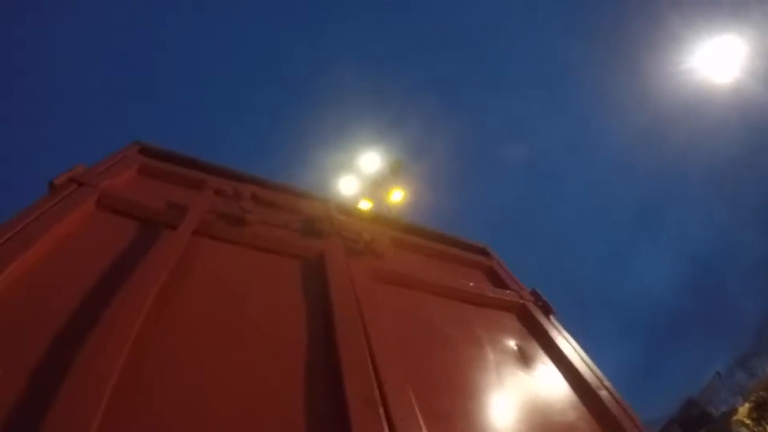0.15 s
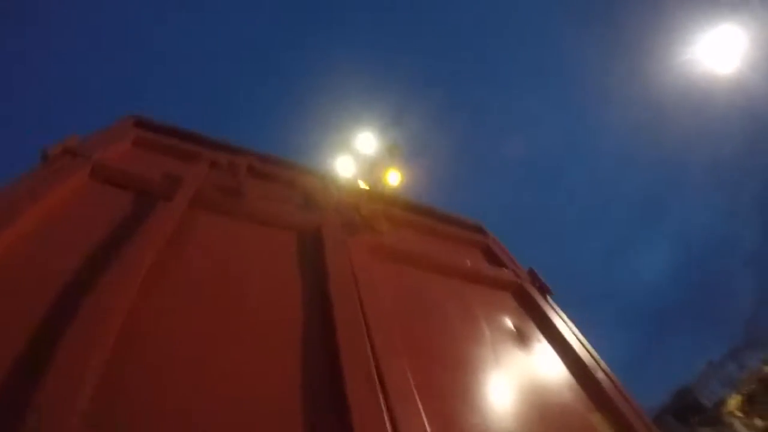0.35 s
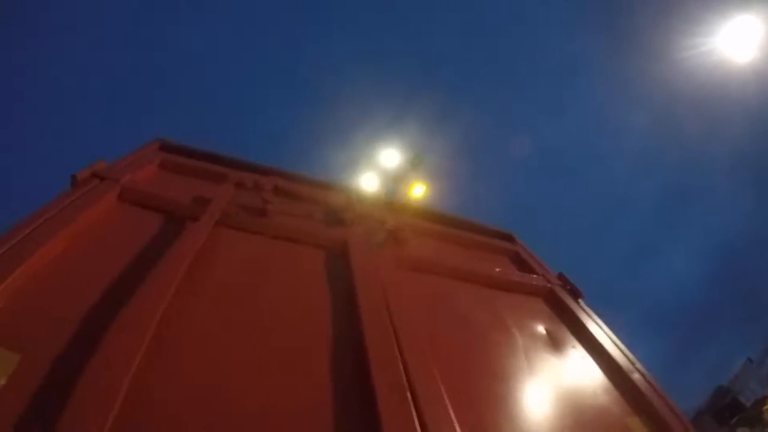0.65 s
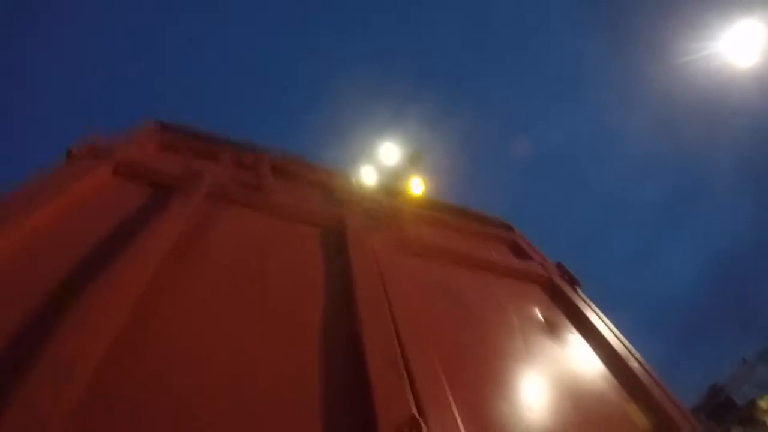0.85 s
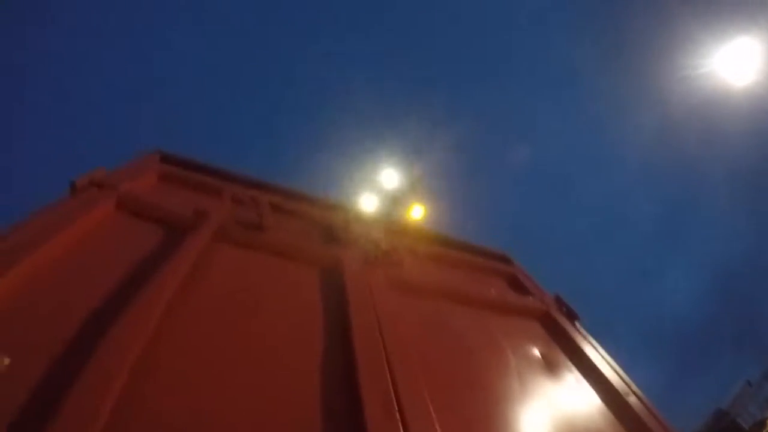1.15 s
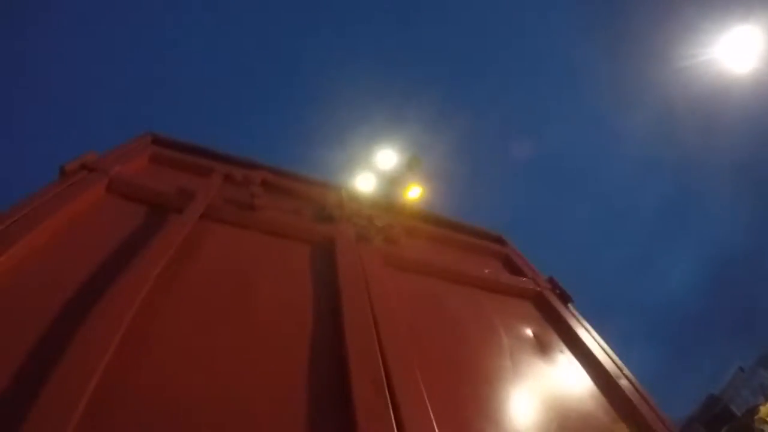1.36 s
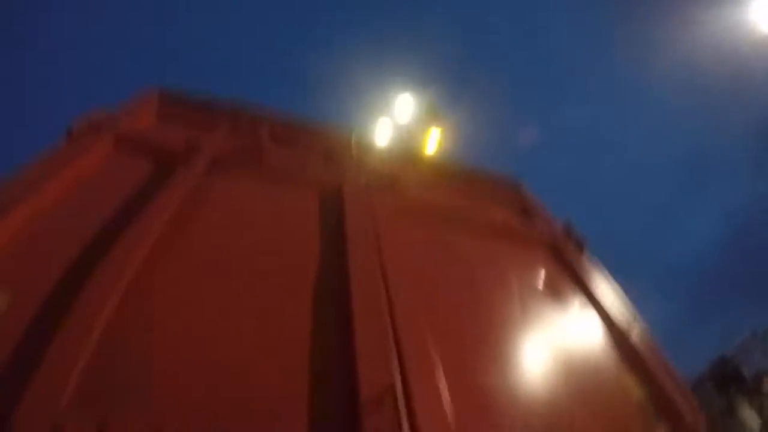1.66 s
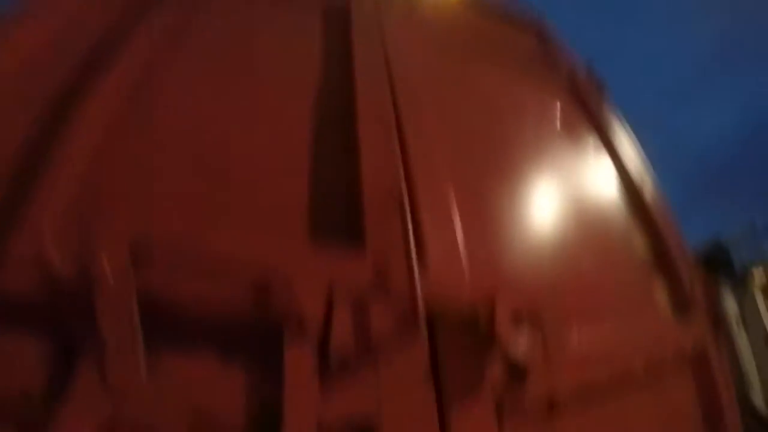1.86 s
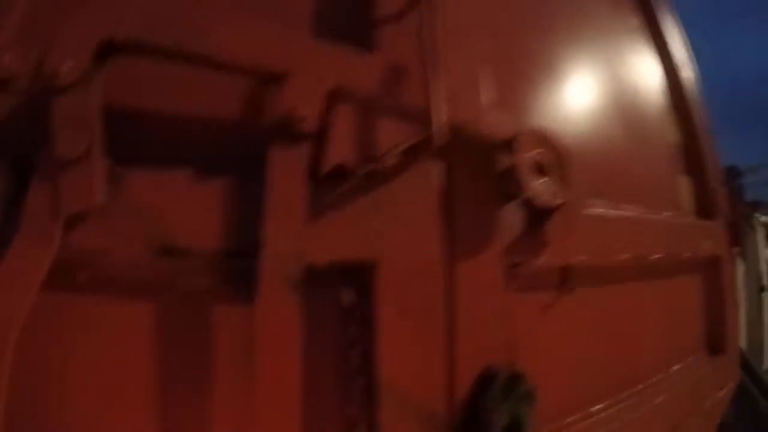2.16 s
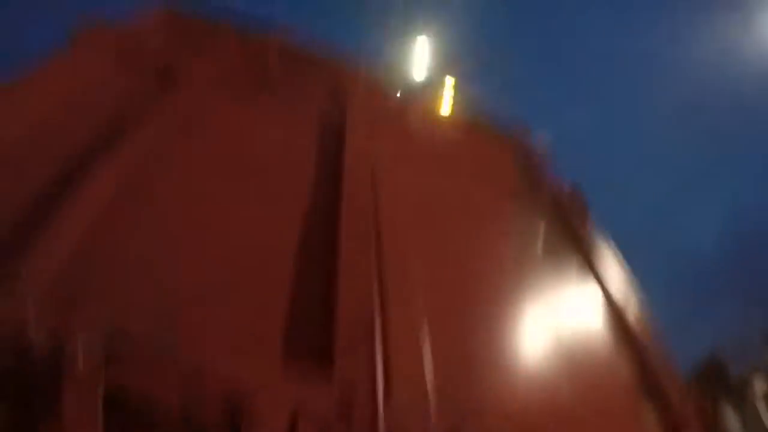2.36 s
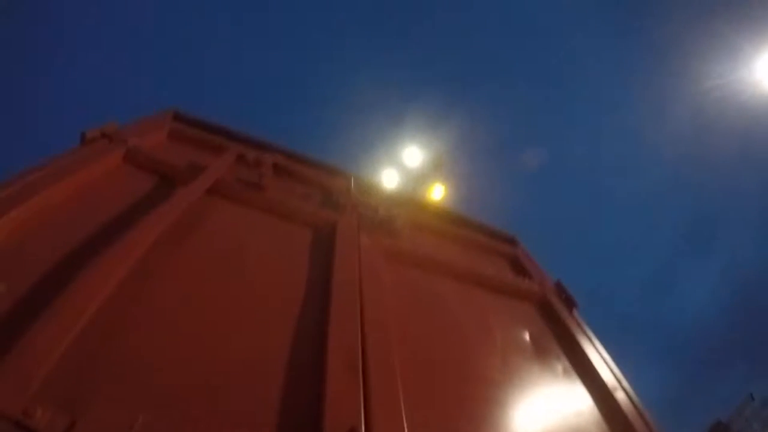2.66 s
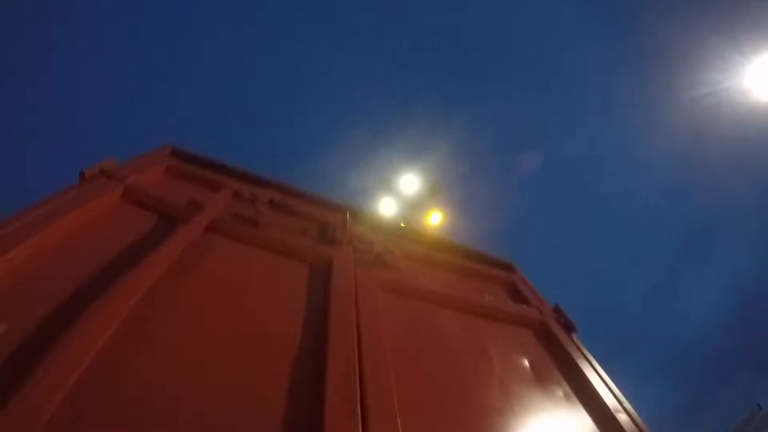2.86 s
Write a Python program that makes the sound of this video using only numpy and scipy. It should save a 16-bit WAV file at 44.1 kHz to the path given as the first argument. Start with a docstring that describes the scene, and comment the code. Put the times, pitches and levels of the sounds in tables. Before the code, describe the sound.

Steel door bars and hook gear knock and chatter on a hollow container in two strong bouts, separated by quiet scraping and a short groan, over steady truck idling and swelling low rumble, recorded close outdoors.

```python
"""A diesel runs steadily over a deep swelling rumble as a hooklift truck drags a steel container aboard, outdoors.
Engine and rumble are low sines plus coloured noise. The load slips in two main bouts: door bars and hook gear
clank and chatter (fading noise and modes), the hollow box booms after them, single parts sing out and a small
loose part pings. Between the bouts dragged steel scrapes (rough noise), squeals (sinking narrow noise) and
groans (juddering modes)."""
import sys
import numpy as np
from scipy import signal
from scipy.fft import rfft, irfft, next_fast_len
from scipy.io import wavfile
from scipy.ndimage import map_coordinates

SR = 44100
rng = np.random.default_rng(int(sys.argv[2]) if len(sys.argv) > 2 else 0)


def unload_wav(signal):
    """Save mono or channel-first audio to the path in sys.argv[1] as 16-bit WAV at rate SR, clipped to [-1, 1]."""
    wavfile.write(
        sys.argv[1],
        SR,
        np.round(np.clip(np.atleast_2d(signal).T, -1, 1) * 32767).astype(np.int16),
    )


N = 132300
T = np.arange(N) / SR  # seconds


def amp(db):
    """Decibels to gain."""
    return 10 ** (np.asarray(db) / 20)


def unit(x):
    """Scale to rms 1."""
    return x / np.sqrt(np.mean(x ** 2) + 1e-20)


def along(points, hz):
    """Read (Hz, value) points on a log frequency axis."""
    point_hz, value = np.transpose(points)
    return np.interp(np.log(hz + 1), np.log(point_hz + 1), value)


def wobble(rate, t):
    """Smooth random curve with rate knots per unit of t."""
    return map_coordinates(rng.standard_normal(4096), [t * rate], mode="wrap")


def tilt(hz, slope_db):
    """Gain of a slope in dB per octave that pivots at 2500 Hz and is flat outside 800-9000 Hz."""
    return amp(slope_db * np.log2(np.clip(hz, 800, 9000) / 2500))


def noise(colour, size, slope_db=0, ripple_db=0, spacing_hz=70):
    """Coloured noise of rms 1, gathered into crowded random resonances by the ripple."""
    m = next_fast_len(size + 8192)
    hz = np.fft.rfftfreq(m, 1 / SR)
    colour_db = along(colour, hz) + ripple_db * wobble(1 / spacing_hz, hz)
    gain = amp(colour_db) * tilt(hz, slope_db)
    spectrum = rfft(rng.standard_normal(m)) * gain
    return unit(irfft(spectrum, m)[:size])


def fade(t, hold, t60):
    """Hold, then exponential decay by 60 dB in t60 seconds."""
    return np.exp(-np.log(1000) * np.maximum(t - hold, 0) / t60)


def dying(x, t60s, hold):
    """Each frequency band of x holds, then dies at its own speed."""
    hz, t, bands = signal.stft(x, SR, nperseg=256)
    faded = bands * fade(t, hold, along(t60s, hz)[:, None])
    return signal.istft(faded, SR, nperseg=256)[1][:len(x)]


def ring(modes, t, hold, width_hz, slope_db=0):
    """Decaying modes with drifting phase, struck with new strengths each time; rms 1 at the start."""
    mode_hz, db, t60s = np.transpose(modes)
    gains = amp(db + 2 * rng.standard_normal(len(mode_hz))) * tilt(mode_hz, slope_db)
    knots = np.arange(128) / width_hz
    total = np.zeros(len(t))
    for hz, gain, t60 in zip(mode_hz, gains, t60s):
        # a random walk of the phase blurs the line
        start_turns = rng.random()
        drift = np.interp(t, knots, np.cumsum(rng.standard_normal(128)))
        total += gain * fade(t, hold, t60) * np.sin(2 * np.pi * (hz * t + start_turns) + drift)
    return total * np.sqrt(2) / np.linalg.norm(gains)


def add(out, s, x):
    """Mix x into out at time s, cut off at the end of out."""
    part = out[int(s * SR):][:len(x)]
    part += x[:len(part)]


def engine():
    """Diesel: steady low firing orders with a slightly uneven speed, and noise that throbs at a similar rate."""
    # steady low lines: pitch_hz, level_db
    orders = [(33.3, -39.5), (66.6, -44), (99.9, -41.5)]
    # noise colour: freq_hz, relative density_db per Hz
    colour = [(20, -24), (60, 11), (110, 0.5), (150, -4), (400, -11), (750, -26.5), (1100, -15),
              (1500, -30.5), (2500, -29), (6000, -45.5), (14500, -51)]
    noise_db, throb_hz, throb_depth = -38, 32.4, 0.13
    time = T + 0.0014 * wobble(2.2, T)  # uneven running shared by lines and throb
    lines = np.zeros(N)
    for hz, db in orders:
        level = amp(db + 0.77 * wobble(5.15, T))
        lines += level * np.sqrt(2) * np.sin(2 * np.pi * (hz * time + rng.random()))
    throb = 1 + throb_depth * np.sin(2 * np.pi * throb_hz * time)
    return lines + amp(noise_db) * unit(noise(colour, N) * throb)


def rumble():
    """A very deep tone that wanders in pitch, with low noise; both swell and sink together."""
    # swells: time_s, level_db
    swells = [(0, -35), (.27, -31), (.36, -20), (.65, -40), (.8, -26), (.89, -33), (1.06, -23), (1.5, -41),
              (1.78, -29), (2.1, -38), (2.22, -21), (2.48, -39), (2.62, -27), (3, -45)]
    # noise colour: freq_hz, relative density_db per Hz
    colour = [(50, 3.5), (120, -16.5), (400, -78)]
    centre_hz, pitch_wander, noise_db = 26.5, .14, -7  # noise relative to the tone
    time_s, level_db = np.transpose(swells)
    hz = centre_hz * np.exp(pitch_wander * wobble(12, T))
    tone = np.sqrt(2) * np.sin(2 * np.pi * np.cumsum(hz) / SR)
    mix = unit(tone + amp(noise_db) * noise(colour, N))
    return amp(np.interp(T, time_s, level_db)) * mix


def clank(t, bright_db, hold):
    """Steel against steel: a short noise crack, a chattering noise body and the ring of bars and hook."""
    # broad colour: freq_hz, relative density_db per Hz
    colour = [(150, -33), (780, -6.5), (1130, 7), (1430, -6), (1720, 3), (2250, 1), (3000, 0.5),
              (3450, -5.5), (4400, -3.5), (6300, -19.5), (7500, -21.5), (9000, -32.5), (15000, -48.5)]
    # decay of the body: freq_hz, t60_s
    decay = [(500, 0.46), (2000, 0.16), (5000, 0.1), (12000, 0.03)]
    # ringing door bars and hook: pitch_hz, relative level_db, t60_s
    steel_modes = [(1170, -7, .2), (1694, -2, .24), (1787, -4, .25), (2033, -3, .24), (2132, -6, .2),
                   (2266, 0, .2), (2336, -3, .18), (2754, -5, .18), (2905, -4, .2), (3106, -3, .16),
                   (4020, -8, .12), (4304, -9, .12), (5085, -17, .12), (7240, -22, .1)]
    body_db, ring_db, crack_db = 3.0, -2.5, 6.5
    chatter_rate, chatter_db = 300, 3  # knots per second, depth
    attack_s, crack_t60_s = .0007, 0.028
    contacts = unit(amp(chatter_db * wobble(chatter_rate, t)))
    grain = noise(colour, len(t), bright_db, ripple_db=4.5, spacing_hz=54.33)
    body = contacts * dying(grain, decay, hold)
    ringing = ring(steel_modes, t, hold, width_hz=35, slope_db=bright_db)
    crack = noise(colour, len(t), bright_db) * fade(t, 0, crack_t60_s)
    hit = amp(body_db) * body + amp(ring_db) * ringing + amp(crack_db) * crack
    return hit * (1 - np.exp(-t / attack_s))


def boom(t, hold):
    """The hollow box: resonant noise and panel modes build up behind the clank, shudder and die slowly."""
    # colour: freq_hz, relative density_db per Hz
    colour = [(35, -5), (65, 4), (110, 3.5), (145, -1), (420, -5.5), (550, -8.5), (780, -19), (1100, -16),
              (2200, -30.5), (5000, -35.5), (12000, -66)]
    # decay of the noise: freq_hz, t60_s
    decay = [(60, 1.19), (300, 1.07), (700, 0.6)]
    # wall panels: pitch_hz, relative level_db, t60_s
    panel_modes = [(167, -2, 1.5), (203, -3, 1.2), (247, -5, .9), (313, -3, 1.3), (350, -4, .9),
                   (392, -3, .9), (421, -2, 1.0), (466, -4, .8), (538, -8, .9), (662, -17, .7)]
    panel_db, attack_s, shudder_db = -4, 0.0034, 2.5
    air = dying(noise(colour, len(t), ripple_db=3, spacing_hz=16), decay, hold)
    panels = amp(panel_db) * ring(panel_modes, t, hold, width_hz=7.13)
    shudder = amp(shudder_db * wobble(36, t))
    return (air + panels) * shudder * (1 - np.exp(-t / attack_s))


def knocks():
    """Each slip of the load strikes a bright clank and sets the box booming behind it."""
    # steel knocks: start_s, clank_db and boom_db (relative, before the trims below),
    # brightness_db per octave, hold_s (both layers hold before they decay)
    hits = [ (.073, -34.5, -40, 2.5, 0.0048), (0.287, -30.5, -47, 5, 0.0052), (.290, -28, -55, 3, 0.0058),
            (.328, -40, -37.5, -19, .004), (.346, -37, -36, -3.5, .006), (.398, -42, -51, 2.5, 0.0035),
            (0.427, -38.5, -44, -15, 0.0024), (.486, -40.5, -35, 7.5, 0.0018),
            (0.522, -38.5, -42, 5, 0.0039), (.572, -45.5, -42, -14, 0.0088), (.68, -71, -52, -9, 0.0035),
            (0.769, -45, -52, -3, 0.015), (0.912, -36, -37, -1.5, 0.0034), (0.975, -34, -32.5, -5, 0.0018),
            (1.037, -28, -27.5, -2, 0.0047), (1.056, -25, -27, -2.5, 0.0069),
            (1.101, -25.5, -27.5, 3, 0.0077), (1.152, -20.5, -34, 4, 0.018), (1.192, -53, -35, -5, .002),
            (1.245, -39.5, -39, -6.5, 0.0076), (1.378, -41, -51, 3, 0.0032),
            (1.581, -47.5, -44, -18, 0.0045), (2.024, -45.5, -44, -11, 0.0039),
            (2.110, -32.5, -37.5, -8, 0.014), (2.241, -20, -30.5, 0, 0.0018),
            (2.257, -28.5, -29.5, 6.5, 0.0021), (2.317, -29.5, -27.5, 1, 0.018),
            (2.384, -19, -29, 5, 0.022), (2.409, -22, -30, 5, .012), (2.559, -44.5, -41, 4, 0.0038)]
    clank_trim_db, boom_trim_db = -5.0, 1.5
    out, clank_t, boom_t = np.zeros(N), T[:SR // 3], T[:SR]
    for s, clank_db, boom_db, bright_db, hold in hits:
        add(out, s, amp(clank_db + clank_trim_db) * clank(clank_t, bright_db, hold))
        add(out, s, amp(boom_db + boom_trim_db) * boom(boom_t, hold))
    return out


def singing():
    """Some knocks set one part ringing well above the rest; it builds up over a few cycles."""
    # parts that sing out: start_s, pitch_hz, level_db, t60_s
    parts = [(.073, 432.4, -32.5, 0.23), (0.075, 7230, -50.5, 0.12), (0.292, 2710, -27.5, 0.056),
             (.398, 3150, -34, 0.027), (.486, 1655, -39, 0.11), (.487, 390, -26, 0.12),
             (.974, 223.4, -19, 0.12), (1.035, 2800, -26, .025), (1.038, 2060, -18.5, 0.042),
             (1.040, 3990, -33.5, 0.047), (1.101, 1662, -22.5, 0.084), (1.101, 2910, -40, 0.26),
             (1.16, 393, -29.5, 0.41), (2.112, 1167, -31, .1), (2.384, 2265, -20.5, .2),
             (2.384, 2480, -19.5, 0.043), (2.391, 416.5, -18.5, .22)]
    out, t = np.zeros(N), T[:SR // 2]
    for s, hz, db, t60 in parts:
        build_up = 1 - np.exp(-t * hz / 2)
        add(out, s, amp(db) * ring([(hz, 0, t60)], t, 0, width_hz=9.9) * build_up)
    return out


def pin():
    """A small hard loose part rings high; a light touch dies sooner."""
    # strikes: start_s, level_db, share of the full ring time
    strikes = [(0.488, -51, 0.4), (1.101, -45.5, 1)]
    # modes: pitch_hz, relative level_db, full t60_s
    pin_modes = [(9598, -11, .45), (10150, 0, .22), (10840, -9, .42)]
    out = np.zeros(N)
    for s, db, share in strikes:
        modes = [(hz, level, t60 * share) for hz, level, t60 in pin_modes]
        add(out, s, amp(db) * ring(modes, T[:SR // 2], 0, width_hz=95))
    return out


def scrape():
    """Sliding steel rasps as rough noise; a broken squeal of narrow noise swells, sinks in pitch and fades."""
    # rasp envelope: time_s, level_db (silent outside)
    strokes = [(1.55, -76), (1.68, -47.5), (1.881, -52.5), (1.97, -56.5), (2.2, -48.5)]
    # rasp colour: freq_hz, relative density_db per Hz
    colour = [(200, -23), (650, 3), (850, -11), (1150, 6.5), (1500, -4), (4000, -15.5), (12000, -44)]
    # squeal partials: pitch_hz as the rasp begins, level_db at the peak of the swell
    partials = [(2870, -50), (4600, -70)]
    peak_s, rise_db_per_s, fall_db_per_s = 1.8, 85, 38
    sag_hz_per_s, width_hz, break_db = 480, 380, 2.5
    time_s, level_db = np.transpose(strokes)
    rasp = noise(colour, N) * unit(amp(2.8 * wobble(45.17, T)))
    rasp_level = amp(np.interp(T, time_s, level_db, left=-np.inf, right=-np.inf))
    squeal = np.zeros(N)
    for hz, db in partials:
        phase = 2 * np.pi * np.cumsum(hz - sag_hz_per_s * (T - time_s[0])) / SR
        # random sine and cosine strengths widen the tone into a band
        fuzzy = wobble(width_hz, T) * np.sin(phase) + wobble(width_hz, T) * np.cos(phase)
        squeal += amp(db) * unit(fuzzy * amp(break_db * wobble(80, T)))
    swell_db = np.minimum(rise_db_per_s * (T - peak_s), fall_db_per_s * (peak_s - T))
    return rasp_level * rasp + amp(swell_db) * squeal


def groan():
    """The sliding load catches and groans: a few partials held briefly under a rough judder."""
    # groans: start_s, hold_s, pitch_hz, level_db
    catches = [(1.685, 0.034, 676, -46.5), (1.871, 0.023, 367.4, -30.5)]
    # partials: multiple of the pitch, relative level_db, t60_s
    partials = [(1, 0, .22), (3.05, -16, .12), (3.34, -12, .12)]
    out, t = np.zeros(N), T[:SR // 2]
    attack = 1 - np.exp(-t / 0.0083)
    for s, hold, hz, db in catches:
        modes = [(multiple * hz, level, t60) for multiple, level, t60 in partials]
        judder = unit(amp(3.6 * wobble(172, t)))
        add(out, s, amp(db) * judder * ring(modes, t, hold, width_hz=13) * attack)
    return out


def scene():
    """All layers summed into one channel."""
    steel = knocks() + singing() + pin() + scrape() + groan()
    return (engine() + rumble() + steel)[None]


def record(dry):
    """A sharp band limit: nothing sounds above the top frequency."""
    top_hz = 15200
    m = next_fast_len(N + SR // 2)
    passed = np.fft.rfftfreq(m, 1 / SR) < top_hz
    return irfft(rfft(dry, m) * passed, m)[..., :N]


dry = scene()
out = record(dry)
unload_wav(out)
```